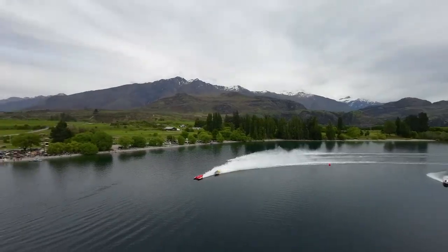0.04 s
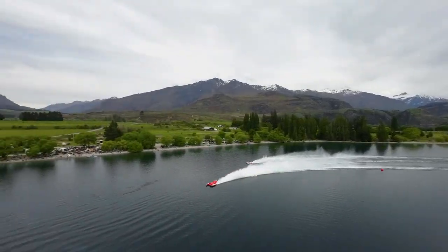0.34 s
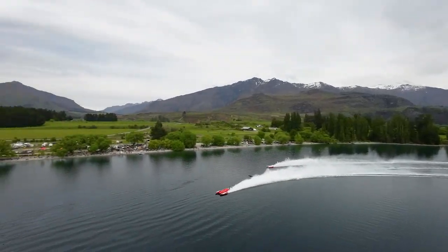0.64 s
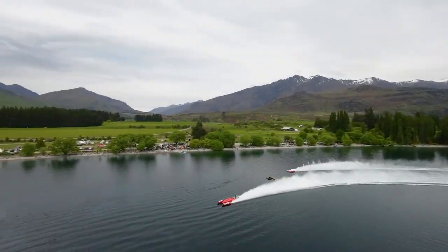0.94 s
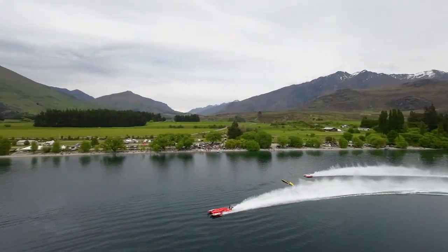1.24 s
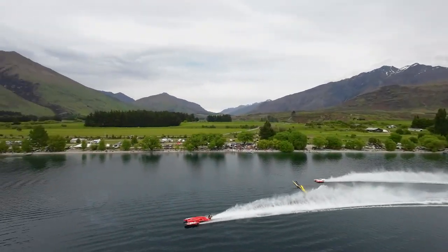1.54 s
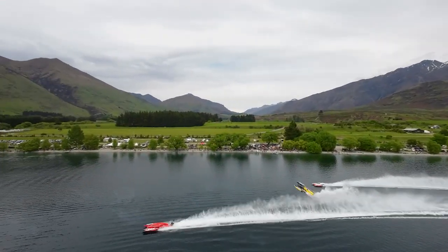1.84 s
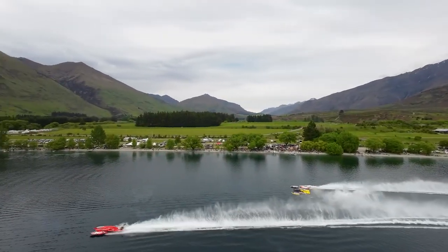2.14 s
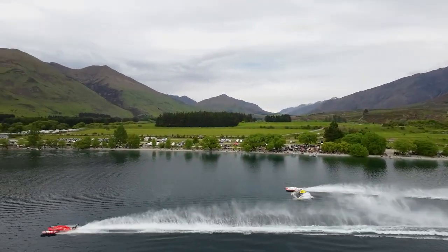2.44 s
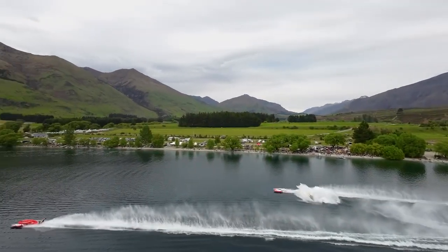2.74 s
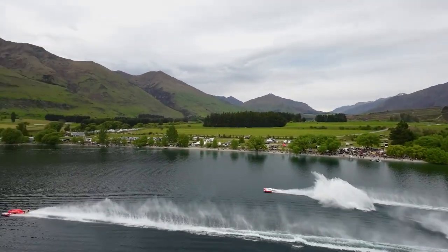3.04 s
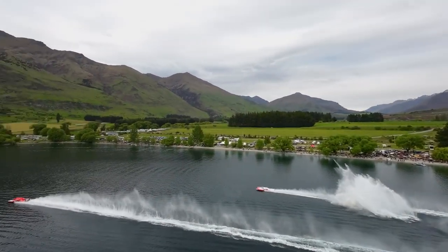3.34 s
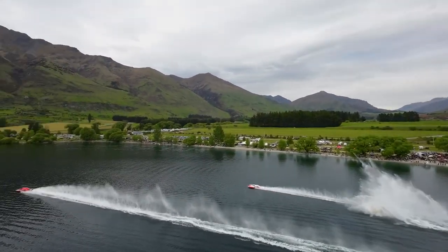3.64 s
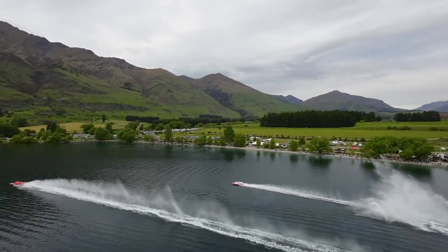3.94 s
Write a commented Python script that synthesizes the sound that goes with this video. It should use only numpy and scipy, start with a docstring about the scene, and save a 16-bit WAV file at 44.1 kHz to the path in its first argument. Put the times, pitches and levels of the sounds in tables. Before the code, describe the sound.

A speedboat engine drones hard, its revs briefly flaring, with wind rumble and rushing water.

```python
"""Racing boat at full throttle

An eight-cylinder engine heard from on board, its revs flaring whenever the hull skips and the
propeller loses its bite. The exhaust drones through fixed pipe and hull resonances, and bursts of hot
gas rasp once a cycle. Behind it are buffeting wind, rushing spray, a low boom and a thin steady whine."""
import sys
import numpy as np
from scipy import signal
from scipy.fft import rfft, irfft
from scipy.io import wavfile
from scipy.ndimage import uniform_filter1d, minimum_filter1d

SR = 44100
rng = np.random.default_rng(int(sys.argv[2]) if len(sys.argv) > 2 else 0)


def output_pcm(signal):
    """Save a mono or channel-first signal as 16-bit PCM at the path in sys.argv[1].

    Samples are clipped to [-1, 1] before scaling.
    """
    pcm = np.clip(np.atleast_2d(signal).T, -1, 1) * 32767
    wavfile.write(sys.argv[1], SR, np.round(pcm).astype(np.int16))


N = 176400

# Engine speed in firing cycles per second: time_s, rate_hz
REVS = [(0.0, 61.13), (0.07, 61.26), (0.13, 58.9), (0.22, 57.5), (0.38, 63.1), (0.46, 62.53), (0.54, 65.3),
        (0.681, 58.57), (0.77, 63.8), (0.921, 58.74), (1.05, 63.17), (1.1, 61.2), (1.2, 63.74),
        (1.292, 68.7), (1.34, 62.87), (1.41, 61.7), (1.57, 69.8), (1.64, 67.83), (1.7, 58.93),
        (1.76, 62.66), (1.82, 74.43), (1.83, 75.39), (1.89, 72.65), (1.91, 64.7), (1.93, 61.87),
        (2.0, 64.98), (2.08, 64.16), (2.2, 65.85), (2.269, 62.75), (2.31, 64.35), (2.35, 62), (2.49, 64.24),
        (2.57, 62.52), (2.63, 64.53), (2.69, 61.62), (2.8, 63.37), (2.858, 68.77), (2.93, 61.66),
        (2.96, 62.8), (3.289, 60.8), (3.4, 63.52), (3.56, 60.0), (3.66, 61.9), (3.709, 65.5), (3.79, 59.4),
        (3.86, 62.67), (3.93, 60.9), (4.0, 63.8)]
def engine_speed():
    """The revs flare as the propeller loses its bite, with a slight jitter on top."""
    rate_hz = np.interp(np.arange(N) / SR, *np.array(REVS).T)
    return uniform_filter1d(rate_hz, size=600) * (1 + .003 * wander(hz=30.03))


# Harmonics of the firing cycle: harmonic, level_db
HARMONICS = [(1, -10.5), (2, -7), (3, -3), (4, -11.5), (5, -1.5), (6, -7), (7, -2.7), (8, -9.5), (9, -14),
             (10, -13.5), (11, -18), (12, -24), (13, -19), (14, -25), (15, -21.5), (16, -25.5), (17, -22),
             (18, -28.5), (19, -28.5), (20, -29.5), (21, -35), (22, -26.5), (23, -30)]
# Pipe and hull peaks and notches: centre_hz, width_hz, gain_db
RESONANCES = [(112.3, 10, -3), (135.4, 11, 6.5), (211.7, 11.3, -10.5), (283, 10, -0.5), (320.4, 15.2, -6.5),
              (364, 9, -2), (418, 8.6, 1.5), (483.6, 7, -5.5), (506.5, 8.5, 4.5), (547.4, 17, -14),
              (660, 18.4, -9), (708, 13, 4.5), (765, 25, -4.5), (1150, 110, 4), (1420, 14, 4)]
# Shape of the snarl, the ride on the upper harmonics: time_s, level_db
SNARL_RIDE = [(0.0, -24), (0.05, -26.5), (0.29, -24), (0.39, -27), (1.2, -27), (1.26, -25.5), (1.38, -29),
              (1.49, -26), (1.93, -27.5), (1.94, -26.5), (2.22, -25), (2.56, -26.5), (2.62, -24),
              (2.72, -28), (2.82, -22.5), (2.84, -24.5), (3.26, -26.5), (3.29, -26), (3.42, -29.5),
              (3.59, -25.5), (3.99, -28), (4.0, -31.5)]
def exhaust(rate_hz, cycles):
    """Harmonics swell and fade as they slide through the resonances; no two cycles match."""
    tone, grid_hz, cycle_marks = np.zeros(N), np.arange(2500.), np.arange(512)
    response_db = sum(db * bell(grid_hz, hz, width) for hz, width, db in RESONANCES)
    snarl_db = 2.5 + 1.6 * ride_db(SNARL_RIDE)
    for harmonic, db in HARMONICS:
        roughness = .06 + .22 * (harmonic / len(HARMONICS)) ** 2
        phase_scatter, gain_scatter = roughness * rng.standard_normal((2, len(cycle_marks)))
        resonance_db = np.interp(harmonic * rate_hz, grid_hz, response_db)
        gain = undb(db + resonance_db + (harmonic > 13) * snarl_db + .88 * wander(hz=14))
        gain *= 1 + np.interp(cycles, cycle_marks, gain_scatter)
        phase = 2 * np.pi * (harmonic * cycles + rng.random())
        tone += gain * np.sin(phase + np.interp(cycles, cycle_marks, phase_scatter))
    # Above 70.5 Hz the propeller is out of the water and the unloaded exhaust thins.
    thinning_db = -.7 * np.maximum(rate_hz - 70.5, 0)
    return level(tone * undb(thinning_db), db=-12.5)


# Gas bursts within one cycle: position_cycles, width_cycles, strength
GAS_BURSTS = [(0.339, .06, .35), (.54, 0.081, 0.82), (0.761, .08, .7), (0.931, 0.11, 0.43)]
# Rasp EQ: frequency_hz, gain_db
RASP_EQ = [(150, -9.5), (400, 0), (700, -1), (1100, -3), (1600, -7), (2500, -12.5), (4000, -22),
           (5200, -29), (7000, -47.5), (8700, -54.5), (11000, -61.5), (13000, -82)]
def rasp(cycles):
    """Hot gas leaves in a lopsided group of bursts each cycle."""
    flow = .54  # steady bed under the bursts
    for position, width, strength in GAS_BURSTS:
        burst_cycles = cycles - position + 1.5  # each burst peaks halfway through its count
        scatter = undb(2.5 * rng.standard_normal(512))[burst_cycles.astype(int)]
        flow += strength * scatter * bell(burst_cycles % 1, .5, width)
    return level(equalise(flow * rng.standard_normal(N), RASP_EQ), db=-24)


# Wind and hull rumble EQ: frequency_hz, gain_db
WIND_EQ = [(15, -16), (30, -8), (42, 5), (55, 0), (85, 1.5), (120, -1), (200, -3), (300, -3), (500, -8),
           (900, -24.5), (3000, -70)]
def wind():
    """Gusty low buffeting from the airstream and the hull."""
    gusts = rng.standard_normal(N) * undb(wander(hz=9.1))
    return level(equalise(gusts, WIND_EQ), db=-19)


# Spray EQ: frequency_hz, gain_db
SPRAY_EQ = [(300, 0), (900, -0.5), (2000, -7.5), (4000, -19), (5500, -23), (7000, -31), (8700, -52.5),
            (11000, -54), (13000, -76.5)]
def spray():
    """Water sheets off the hull in quick uneven surges."""
    surges = rng.standard_normal(N) * undb(1.5 * wander(hz=24.86))
    return level(equalise(surges, SPRAY_EQ), db=-32.5)


# Fader ride on the boom: time_s, level_db
BOOM_RIDE = [(0.0, -25), (0.11, -23.5), (1.98, -22), (2.06, -32.5), (3.89, -33), (3.93, -28), (4.0, -39.5)]
def boom():
    """A wavering low boom that holds its pitch and drops back halfway through."""
    return noise_band(centre_hz=156.5, width_hz=7, db=-27.5) * undb(ride_db(BOOM_RIDE))


def whine():
    """A thin steady whine that does not follow the revs."""
    return noise_band(centre_hz=890, width_hz=11, db=-38)


def undb(db):
    """Decibels to gain."""
    return 10 ** (np.asarray(db) / 20)


def level(x, db):
    """Scale to an rms level."""
    return x * undb(db) / np.sqrt(np.mean(x ** 2))


def wander(hz):
    """Smooth random drift with an rms of 1."""
    hold = int(SR / hz)
    steps = rng.standard_normal(4096)[np.arange(N) // hold % 4096]
    return level(uniform_filter1d(steps, hold), db=0)


def equalise(x, curve):
    """Filter by an EQ curve drawn on a log frequency axis."""
    hz, db = np.array(curve, float).T
    bins_hz = np.maximum(np.fft.rfftfreq(N, 1 / SR), 1)
    return irfft(rfft(x) * undb(np.interp(np.log(bins_hz), np.log(hz), db)), N)


def bell(x, centre, width):
    """A rounded bump of height 1."""
    return np.exp(-.5 * ((x - centre) / width) ** 2)


def noise_band(centre_hz, width_hz, db):
    """Noise narrowed to a wavering tone."""
    band = bell(np.fft.rfftfreq(N, 1 / SR), centre_hz, width_hz)
    return level(irfft(rfft(rng.standard_normal(N)) * band, N), db)


def ride_db(curve):
    """A fader ride as dB about its own mean."""
    db = np.interp(np.arange(N) / SR, *np.array(curve).T)
    return db - db.mean()


# Fader ride on rasp and spray together: time_s, level_db
TREBLE_RIDE = [(0.0, -34.5), (0.03, -35.5), (0.54, -34.5), (0.72, -36), (1.21, -36), (1.24, -34.5),
               (1.6, -35.5), (1.73, -32.5), (1.83, -36.5), (1.87, -34.5), (1.89, -39), (1.93, -35),
               (1.99, -33.5), (2.03, -36), (2.1, -34), (2.41, -35), (2.49, -33.5), (2.51, -35.5),
               (3.44, -36), (3.45, -35.5), (3.99, -36), (4.0, -36.5)]
def scene():
    """One engine speed drives exhaust and rasp; wind and water rush on."""
    rate_hz = engine_speed()
    cycles = np.cumsum(rate_hz) / SR
    treble = (rasp(cycles) + spray()) * undb(ride_db(TREBLE_RIDE))
    return (exhaust(rate_hz, cycles) + treble + wind() + boom() + whine())[None]


def record(dry):
    """A fast limiter holds the peaks down; the sound ends softly and the top is cut."""
    fade_s, cutoff_hz, makeup_db = .004, 13700, .3
    peaks = -minimum_filter1d(-np.abs(dry), size=221)
    gain = 1 / (1 + peaks ** 4) ** (1 / 4)
    gain = uniform_filter1d(uniform_filter1d(gain, size=111), size=111)
    fade = np.minimum(np.arange(N)[::-1] / SR / fade_s, 1)
    lowpass = signal.ellip(8, .2, 70, cutoff_hz, fs=SR, output="sos")
    return signal.sosfilt(lowpass, dry * gain * fade * undb(makeup_db))


dry = scene()
out = record(dry)
output_pcm(out)
```